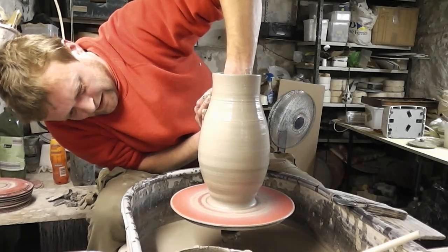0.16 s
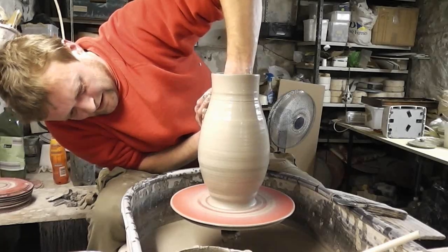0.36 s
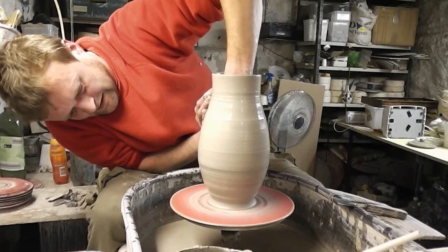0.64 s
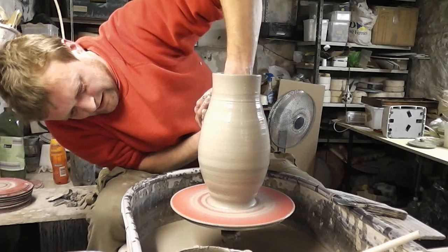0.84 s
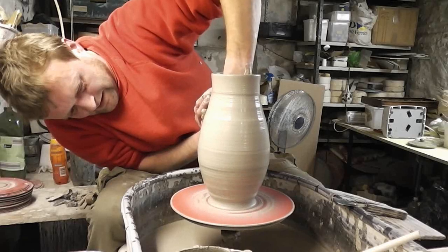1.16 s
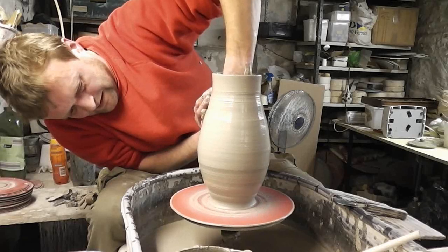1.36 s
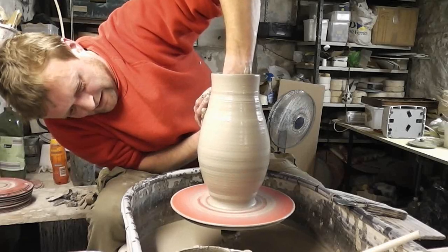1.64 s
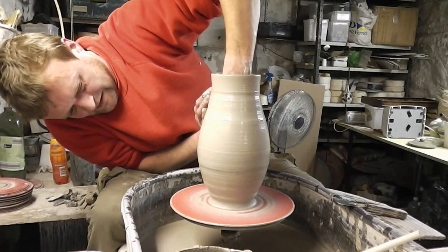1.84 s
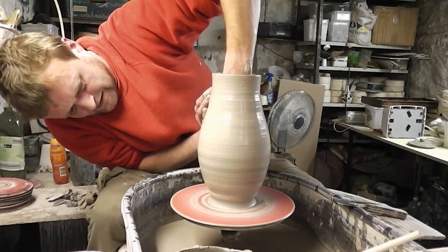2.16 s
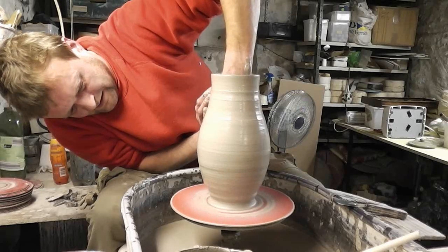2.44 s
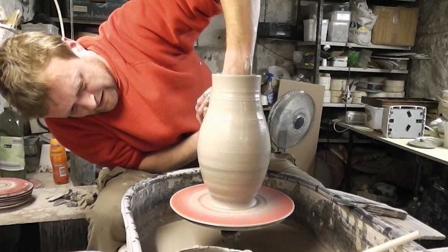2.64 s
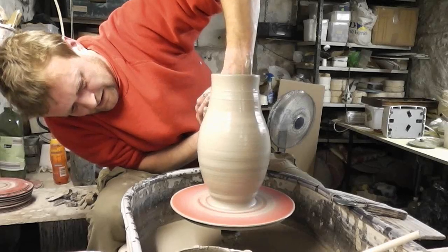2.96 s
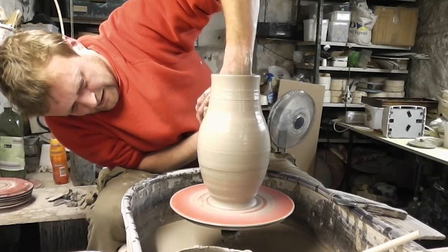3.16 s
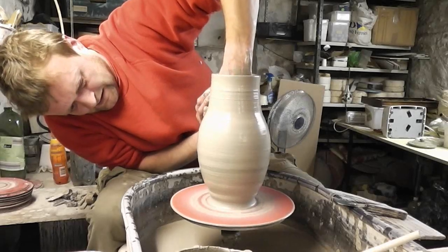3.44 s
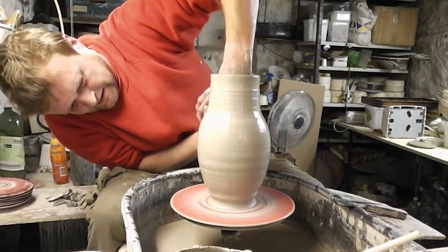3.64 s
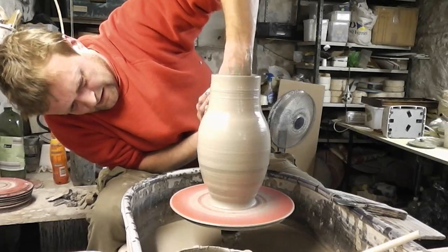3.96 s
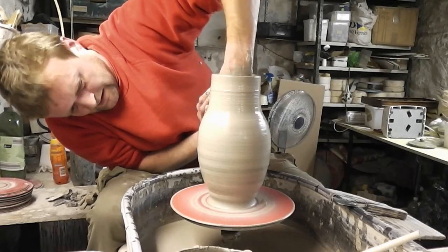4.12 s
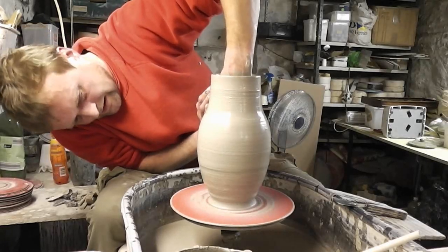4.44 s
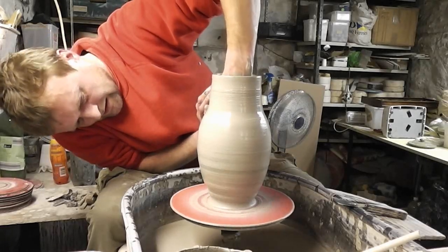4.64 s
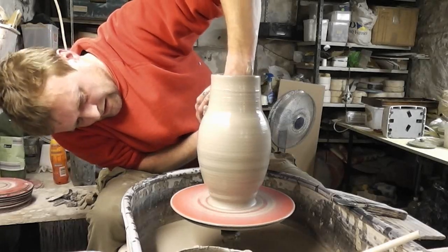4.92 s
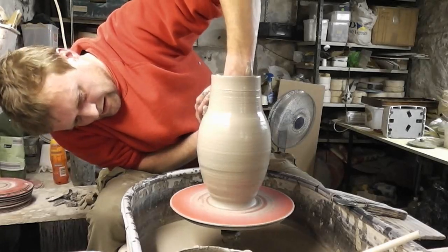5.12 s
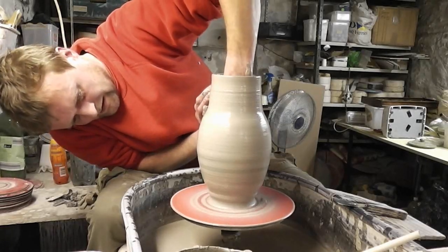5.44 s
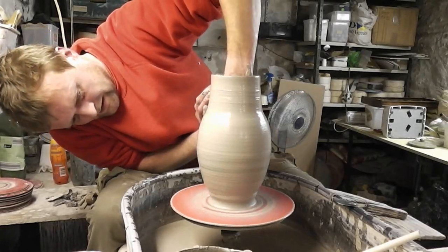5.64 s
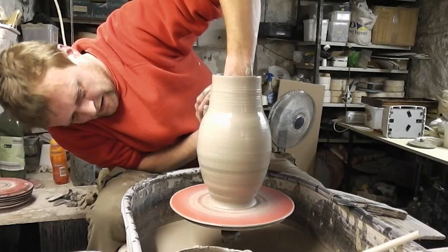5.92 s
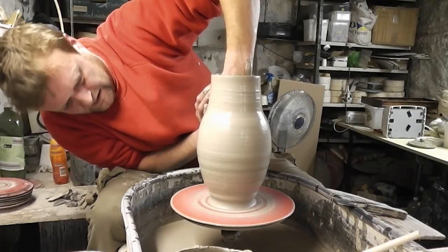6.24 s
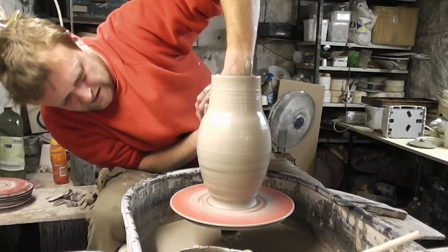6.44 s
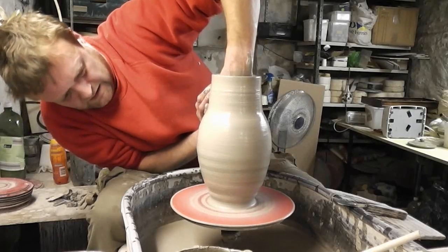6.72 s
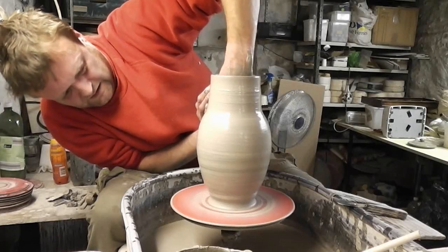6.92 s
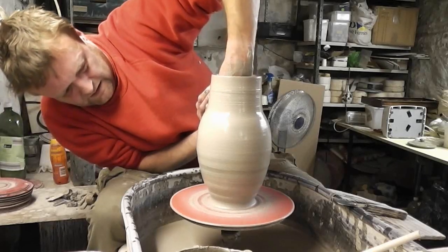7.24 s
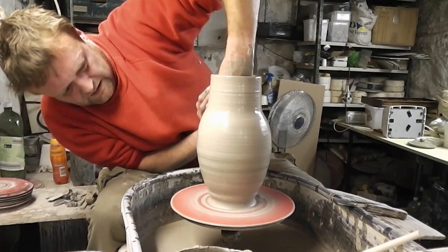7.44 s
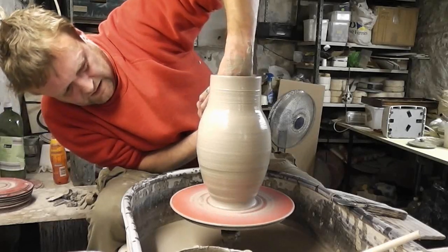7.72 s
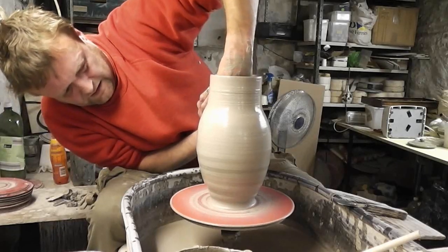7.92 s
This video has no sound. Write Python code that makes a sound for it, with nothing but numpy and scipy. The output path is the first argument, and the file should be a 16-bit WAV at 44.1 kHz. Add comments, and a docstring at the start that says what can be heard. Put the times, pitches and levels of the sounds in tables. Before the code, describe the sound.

Continuous motor drone from a pottery wheel turning a clay vase, heard close and in stereo. The low hum pulses quickly, the frame adds a hollow resonant drone, and a rapid loose rattle flares several times a second, never quite regular. Grainy mid-range grinding rises with each flare. Occasional faint, bright clicks of wet slip; no start or stop.

```python
"""A low electric hum throbs while a loose part chatters over it: a potter's wheel turning under load.
The hum is a set of steady tones at twice the mains rate and its multiples, with side tones that beat.
A knock per torque pulse sets the loose part ringing, harder in bursts; noise shakes the frame into a drone.
Shaped noise makes the grinding drive and the rumble; wet slip clicks now and then, and two faint tones whine.
A small stereo microphone stands close by."""
import sys
import numpy as np
from scipy import signal
from scipy.io import wavfile
from scipy.ndimage import uniform_filter1d

SR = 44100
rng = np.random.default_rng(int(sys.argv[2]) if len(sys.argv) > 2 else 0)


def transcribe(signal):
    """Save signal, clipped to [-1, 1], as a 16-bit WAV file at the path in sys.argv[1]."""
    frames = np.atleast_2d(signal).T
    limited = np.clip(frames, -1, 1)
    pcm = np.round(limited * 32767).astype(np.int16)
    wavfile.write(sys.argv[1], SR, pcm)


N = 356328
TIME = np.arange(N) / SR   # seconds
TORQUE_HZ = 99.927   # torque pulses per second
THROB_HZ = 4.667   # throbs per second (twice the motor's slip rate)


def from_db(db):
    """Turn decibels into a gain."""
    return 10 ** (np.asarray(db) / 20)


def rms_one(x):
    """Scale a sound to an rms (average strength) of 1."""
    return x / np.sqrt(np.mean(x ** 2) + 1e-20)


def at_hz(points, hz):
    """Read a table of (Hz, value) between its rows, with pitch on a log scale."""
    table = np.array(points)
    return np.interp(np.log(hz), np.log(table[:, 0]), table[:, 1])


def drift(rate_hz):
    """A slow random wander of rms 1: noise smoothed by two equal low-pass stages."""
    step = 40   # samples between the points that are worked out
    pole = np.exp(-2 * np.pi * rate_hz * step / SR)
    noise = rng.standard_normal(N // step + 2002)
    slow = signal.lfilter([1], [1, -2 * pole, pole * pole], noise)[2000:]   # skip the start-up
    return np.interp(np.arange(N) / step, np.arange(len(slow)), rms_one(slow))


def ring(force, hz, t60):
    """A resonance: a unit click starts a sine of height 1 that falls by 60 dB in t60 seconds."""
    decay = from_db(-60 / (t60 * SR))
    angle = 2 * np.pi * hz / SR
    return signal.lfilter([0, np.sin(angle)], [1, -2 * decay * np.cos(angle), decay * decay], force + 1e-18)


def clicks(when, sizes):
    """A train of blows, each a single sample long."""
    train = np.zeros(N)
    train[np.clip((when * SR).astype(int), 0, N - 1)] = sizes
    return train


def stereo(mid, side, hz):
    """Mix a shared and an opposed signal so left and right are as alike and as loud as this pitch needs."""
    # Each row: pitch in Hz, likeness of left and right (1 = the same; below 0 is treated as 0).
    likeness = [(60, 1), (150, 0.97), (380, 1), (950, 0.84), (2380, 0.66), (5980, 0.19), (15000, -0.72)]
    # Each row: pitch in Hz, left level minus right level in dB.
    lean = [(60, 0.3), (150, 0.1), (380, 1.0), (700, 1.0), (1400, 2.4), (5980, 2.2), (10000, 1.6),
            (14000, 0.0)]
    alike = np.clip(at_hz(likeness, hz), 0, 1)
    opposed = np.array([[1], [-1]])
    pair = np.sqrt(1 + alike) * mid + np.sqrt(1 - alike) * side * opposed
    return pair * from_db(at_hz(lean, hz) * opposed / 2) / np.sqrt(2)


def banded_noise(spectrum, low_hz, count, patchy_db):
    """Third-octave bands of stereo noise, those below 8 kHz flickering on their own; rms 1 in all."""
    out = 0
    edges = low_hz * 2 ** (np.arange(count + 1) / 3)
    white = rng.standard_normal((2, 2, N))   # neighbouring bands get unrelated noise
    for k, (low, high) in enumerate(zip(edges, edges[1:])):
        band = signal.butter(2, [low, high], "band", fs=SR, output="sos")
        mid, side = signal.sosfilt(band, white[k % 2])
        hz = np.sqrt(low * high)
        flicker_db = patchy_db * (hz < 8000) * drift(14.0)
        out = out + from_db(at_hz(spectrum, hz) + flicker_db) * stereo(mid, side, hz)
    return rms_one(out)


def rumble():
    """Drive and room noise: random noise shaped to be strongest in the bass."""
    # Each row: pitch in Hz, relative noise level per Hz in dB.
    rumble_shape = [(15, -70), (25, -44), (70, -14), (102, -2.5), (148, -28), (247, -3.5), (299, -11),
                    (361, -21), (413, -18), (619, -24.5), (1180, -39.5), (2510, -55.5), (3200, -48),
                    (7390, -48.5), (15700, -54)]
    return from_db(-35.5) * banded_noise(rumble_shape, 24.62, count=29, patchy_db=2.4)


def whine():
    """Faint, steady, very high sine tones, the same in both channels."""
    # Each row: pitch in Hz, rms level in dB.
    whine_tones = [(12500, -88), (15590, -92)]
    # root 2 turns rms into peak
    return sum(from_db(db) * np.sqrt(2) * np.sin(2 * np.pi * hz * TIME) for hz, db in whine_tones)


def slip(t60, low_hz, high_hz):
    """A film of wet slip parts from the fingers: a bright puff of noise that dies at once."""
    # Each row: start in seconds, strength in dB before filtering.
    slip_clicks = np.array([(0.9323, -47), (2.4768, -47), (4.5974, -44), (5.4545, -46), (5.7573, -49),
                            (6.9691, -45)])
    train = clicks(slip_clicks[:, 0], from_db(slip_clicks[:, 1]))
    fade = signal.lfilter([1], [1, -from_db(-60 / (t60 * SR))], train)
    puff = fade * rng.standard_normal((2, N))
    return signal.sosfilt(signal.butter(2, [low_hz, high_hz], "band", fs=SR, output="sos"), puff)


def grind(train, hold_s, rest, lumpy_db):
    """The drive's noise grows while the part knocks hard, and swells in random lumps of its own."""
    # Each row: pitch in Hz, relative noise level per Hz in dB.
    grind_shape = [(400, -9), (700, -4.5), (1200, -4), (1900, -12.5), (2600, -23), (4000, -17.5)]
    shake = signal.lfilter([1], [1, -np.exp(-1 / (hold_s * SR))], train ** 2)   # knock energy, dying away
    shake = uniform_filter1d(shake, size=441)   # smoothed over 10 ms
    effort = (rest + shake / shake.mean()) ** 0.54
    lumps = from_db(-48.5 + lumpy_db * drift(4.2))
    return lumps * banded_noise(grind_shape, 410.0, count=10, patchy_db=1.5) * effort


def frame():
    """Random shaking rings on in each resonance of the frame and tray: a narrow one rings longer."""
    # Each row: pitch in Hz, width in Hz, rms level in dB before any louder moment.
    resonances = [(168.1, 13.7, -37.5), (302.9, 15.4, -38), (411.7, 17, -46), (493.7, 46, -44.5),
                  (544, 30, -54), (598, 5.1, -58), (667, 8.2, -58), (736, 38, -54), (901, 12.6, -56.5),
                  (1030, 57, -64), (1164, 19, -56), (1413, 36, -58.5), (1717, 42, -62.5)]
    # Two moments when the random low noise near 168 Hz happens to be louder.
    # Each row: middle in seconds, rise in dB.
    louder_moments = [(1.09, 10), (5.78, 7)]
    out = 0
    louder_db = sum(db * np.exp(-((TIME - s) / 0.1) ** 2) for s, db in louder_moments)
    for hz, width_hz, level_db in resonances:
        t60 = np.log(1000) / (np.pi * width_hz)
        mid, side = ring(rng.standard_normal((2, N)), hz, t60)
        gain = from_db(level_db + louder_db * (hz < 200))   # only the lowest resonance
        out = out + gain * rms_one(stereo(mid, side, hz))
    return out


def knocks(jitter_s):
    """Time and dB level of one knock per torque pulse: harder at strong points of each throb and in bursts."""
    # Strong points of each throb. Each row: seconds into the throb, rise in dB before the limit.
    strong_points = [(.025, 4), (.098, 1.5), (.128, 3.5), (.192, 6)]
    # Bursts of harder knocking. Each row: middle in seconds, rise in dB before the limit, half-length in seconds.
    knock_bursts = [(0.061, 8.0, 0.03), (0.197, 7.5, 0.015), (0.349, 10.8, 0.015), (0.483, 13.5, 0.014),
                    (0.647, 7, 0.019), (0.786, 11.8, 0.054), (1.085, 1, 0.012), (1.229, 14, 0.016),
                    (1.309, 11, 0.015), (1.398, 9, 0.026), (1.565, 14, 0.012), (1.697, 7, 0.012),
                    (1.733, 8, 0.014), (1.857, 20, 0.011), (1.98, 15, 0.013), (2.096, 3, 0.025),
                    (2.29, 7, 0.054), (2.415, 6, 0.0096), (2.444, 7, 0.012), (2.555, 2, 0.01),
                    (2.602, 6, 0.017), (2.706, 7.5, 0.022), (2.815, 5.5, 0.045), (2.925, 12, 0.019),
                    (3.064, 12, 0.014), (3.25, 9, 0.057), (3.342, 9, 0.032), (3.668, 12, 0.014),
                    (3.755, 6.5, 0.023), (3.917, 10, 0.01), (3.99, 13, 0.014), (4.202, 9.5, 0.033),
                    (4.373, 14, 0.032), (4.603, 6, 0.012), (4.728, 9.7, 0.015), (4.847, 9.4, 0.012),
                    (5.117, 5, 0.0092), (5.28, 9, 0.035), (5.428, 10.0, 0.019), (5.672, 11, 0.0099),
                    (5.718, 11, 0.014), (5.853, 7.9, 0.073), (5.913, 11, 0.009), (6.118, 7, 0.012),
                    (6.203, 10.5, 0.02), (6.345, 15, 0.011), (6.512, 11, 0.016), (6.61, 4, 0.012),
                    (6.666, 11, 0.011), (6.797, 9.8, 0.023), (6.883, 2, 0.0091), (6.94, 4.5, 0.062),
                    (7.054, 4, 0.015), (7.09, 11, 0.012), (7.209, 15, 0.033), (7.32, 10.5, 0.022),
                    (7.632, 4, 0.012), (7.859, 17.5, 0.013), (7.97, 12, 0.01), (8.03, 10, 0.014)]
    light_knock_db, spread_db, point_half_s = -54, 3.5, 0.022   # spread: random unevenness before the limit
    travel_db = 21.5   # the part runs out of travel: the most that shaking adds to a knock
    count = int(N / SR * TORQUE_HZ)
    chance = rng.standard_normal((count, 2))
    when = (np.arange(count) + .8) / TORQUE_HZ + jitter_s * chance[:, 0]
    throb_s = 1 / THROB_HZ
    strong = 0
    for s, db in strong_points:
        away_s = (when - s + throb_s / 2) % throb_s - throb_s / 2   # time from the nearest such point
        strong = strong + db * np.exp(-(away_s / point_half_s) ** 2)
    bursts = sum(db * np.exp(-((when - s) / half_s) ** 2) for s, db, half_s in knock_bursts)
    rise_db = strong + bursts + spread_db * chance[:, 1]
    return when, light_knock_db + travel_db * np.tanh(rise_db / travel_db)


def chatter(when, level, scuffle_s, uneven_db, brighten):
    """Each knock is a soft scuffle: every mode swells and dies, struck at its own instant and strength."""
    # Ways the loose part rings. Each row: pitch in Hz, relative level in dB, t60 in seconds of each ring stage.
    part_modes = [(2810, -12, 0.015), (3130, -3.5, 0.0058), (3457, -2, 0.0041), (3720, -9, 0.0049),
                  (4337, -7.5, 0.0069), (5720, -14.5, 0.0076), (6600, -8.5, 0.0024), (7155, -11, 0.0074),
                  (7470, -12.5, 0.013), (8000, -14, 0.0036), (10320, -21, 0.01)]
    out = 0
    for hz, mode_db, t60 in part_modes:
        late = scuffle_s * rng.random((2, len(when)))
        uneven = uneven_db * rng.standard_normal((2, len(when)))
        # hard knocks favour the high modes
        hard = level + brighten * np.log2(hz / 3500) * (level - level.mean())
        blows = np.array([clicks(when + late[c], from_db(hard + uneven[c])) for c in (0, 1)])
        swell = 2 * np.e * np.log(1000) / (t60 * SR)   # makes the double ring peak at height 1
        mid, side = swell * ring(ring(blows, hz, t60), hz, t60)
        out = out + from_db(mode_db) * stereo(mid, 0.57 * side, hz)   # near point source: channels agree more
    return out


def hum():
    """Motor tones on the torque rate; side tones whole throb and wheel steps away make them throb."""
    # Each row: multiple of the torque rate, rms level in dB.
    hum_tones = [(1, -26.5), (2, -51.5), (3, -38.5), (4, -52.5), (5, -53.5)]
    # Side tones. Each row: multiple they belong to, throb steps away, wheel steps away, rms level in dB,
    # time in seconds when the side tone is in step with its main tone.
    throb_tones = [(1, -4, -1, -48.5, 4.021), (1, -3, -1, -45.5, 4.018), (1, -1, -1, -48.5, 3.964),
                   (1, -1, 0, -36.5, 3.981), (1, 1, 0, -42.5, 4.046), (1, 2, 0, -46.5, 3.957),
                   (1, 3, 0, -47.5, 4.03), (2, -1, 0, -38.5, 4.045), (2, 0, -1, -47.5, 4.077),
                   (3, 2, -1, -49, 4.043), (3, 2, 0, -43.5, 3.991), (4, 2, 0, -48.5, 3.951)]
    wheel_hz = 2.0
    out = 0
    for multiple, level_db in hum_tones:
        hz = multiple * TORQUE_HZ
        swing = from_db(level_db) + 0j
        for carrier, throb, wheel, side_db, crest_s in throb_tones:
            if carrier == multiple:
                beat_hz = throb * THROB_HZ + wheel * wheel_hz
                swing = swing + from_db(side_db) * np.exp(2j * np.pi * beat_hz * (TIME - crest_s))
        tone = swing * np.exp(2j * np.pi * hz * TIME)
        out = out + stereo(tone.real, tone.imag, hz)   # one channel leads a little
    return np.sqrt(2) * out   # rms to peak


def scene():
    """Add the room noise, slip, drive, frame, loose part and motor together."""
    when, level = knocks(jitter_s=.0008)
    background = rumble() + whine() + slip(t60=0.034, low_hz=6000, high_hz=13000)
    drive = grind(clicks(when, from_db(level)), hold_s=0.013, rest=0.48, lumpy_db=0.92)
    part = chatter(when, level, scuffle_s=.00035, uneven_db=1.0, brighten=0.25)
    return background + drive + frame() + part + hum()


def record(dry):
    """The small microphone loses the deep bass; the top is cut steeply."""
    thin = signal.sosfilt(signal.butter(2, 55, "high", fs=SR, output="sos"), dry)
    return signal.sosfilt(signal.ellip(12, .3, 80, 15760, fs=SR, output="sos"), thin)


dry = scene()
out = record(dry)
transcribe(out)
```